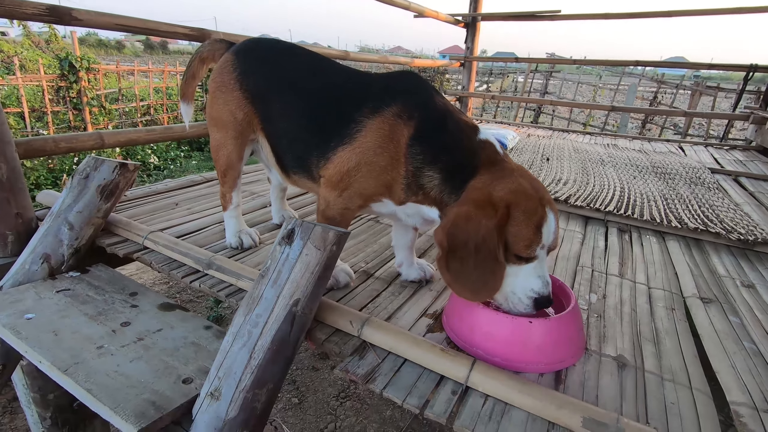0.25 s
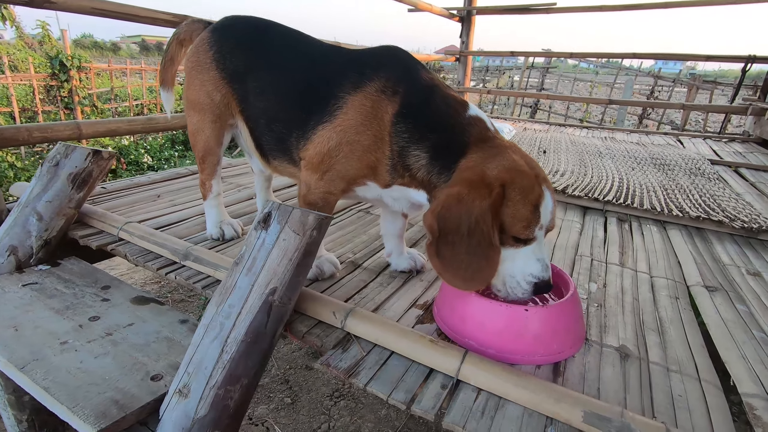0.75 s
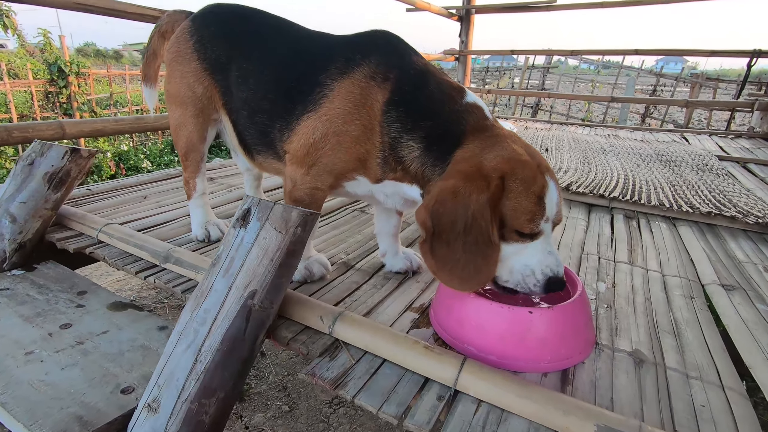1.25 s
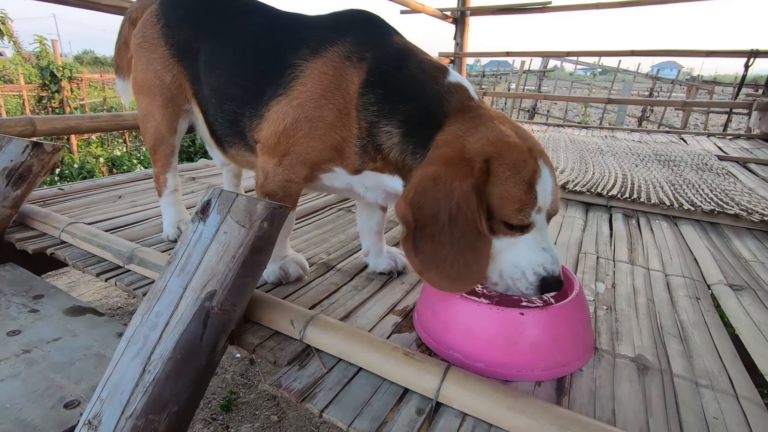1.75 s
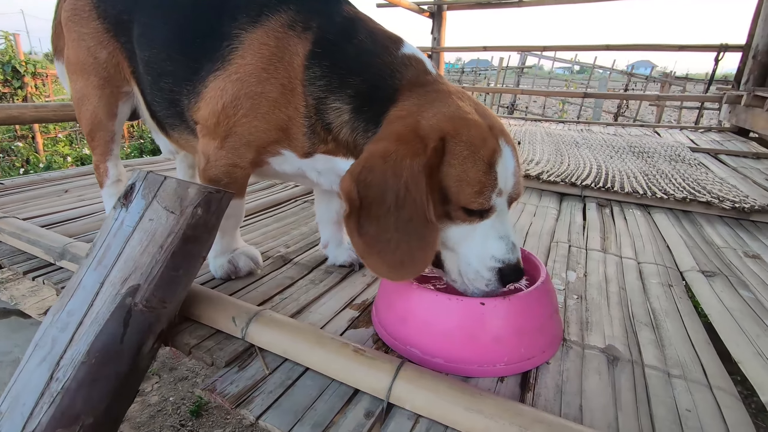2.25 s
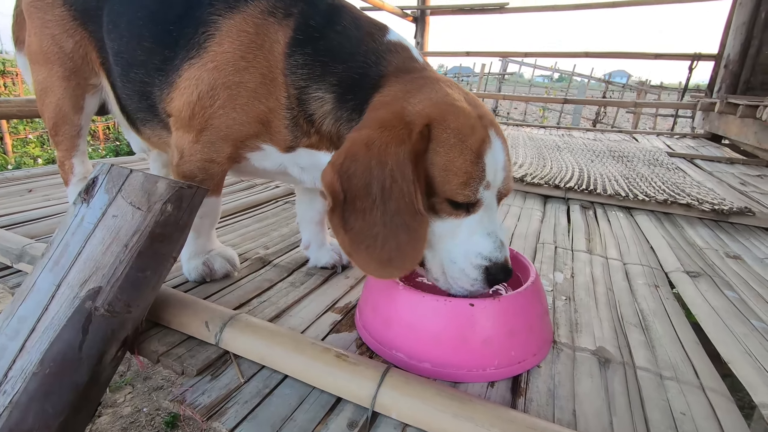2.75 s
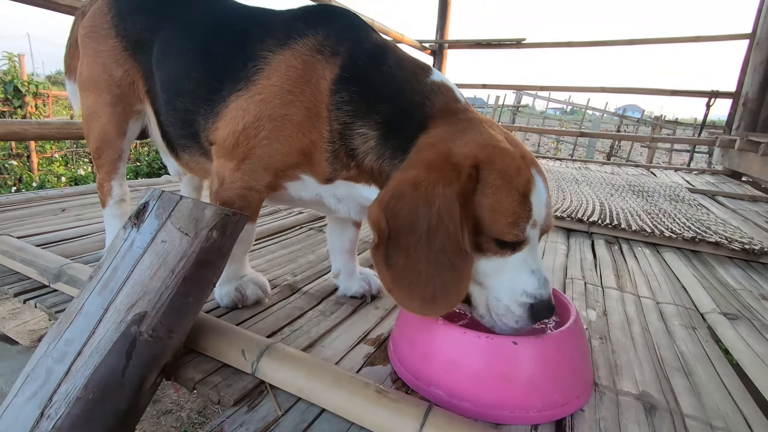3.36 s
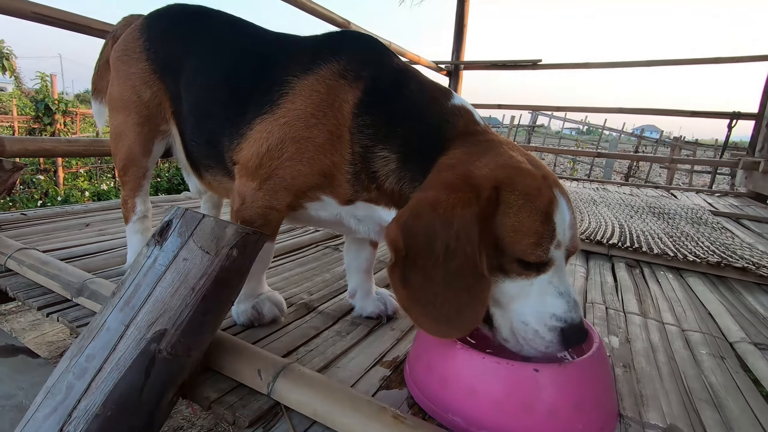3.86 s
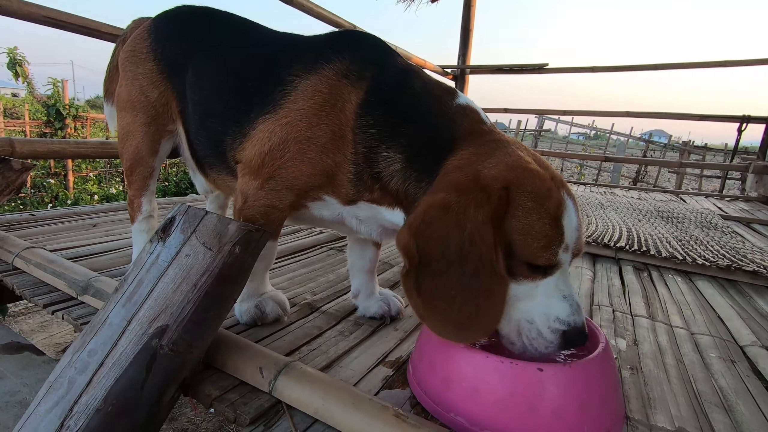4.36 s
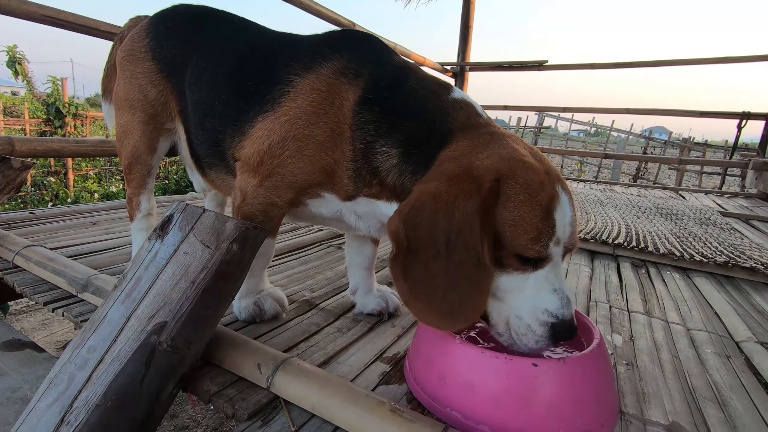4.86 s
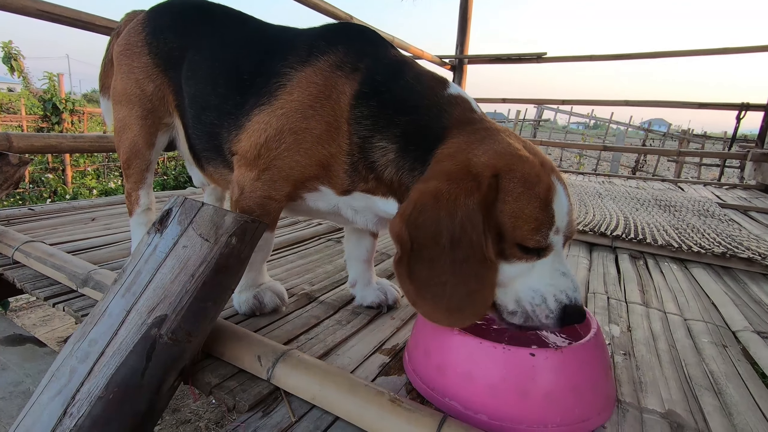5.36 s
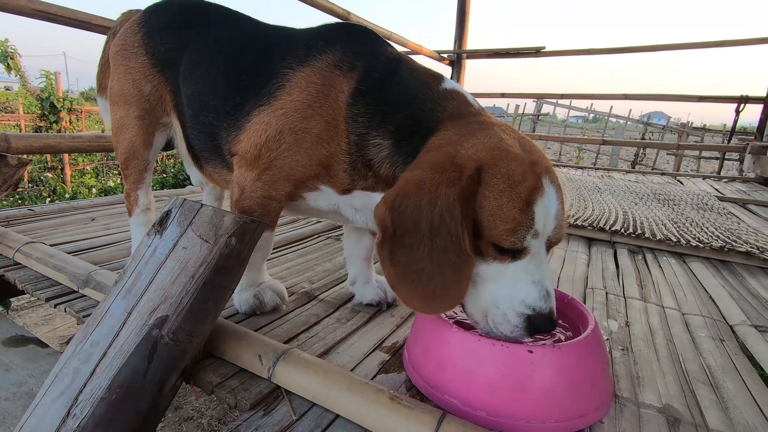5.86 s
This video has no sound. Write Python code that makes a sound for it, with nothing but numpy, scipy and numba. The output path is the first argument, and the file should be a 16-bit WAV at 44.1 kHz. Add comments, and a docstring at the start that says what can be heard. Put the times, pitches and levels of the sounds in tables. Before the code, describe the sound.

Wet slurps and tongue smacks repeat in a fairly even rhythm as a dog drinks from a bowl in the open air. Water plips, gurgles and drips back between laps, getting stronger toward the end. The nearby microphone picks up soft gusts of low wind, a light knock early on and brief scratchy handling noises, over a quiet, steady hiss.

```python
"""A dog laps water from a plastic bowl on an open bamboo deck, a metre from a hand-held camera.
Each stroke of the tongue throws up a swarm of tiny bubbles and smacks in the cavity of mouth and bowl;
the bigger bubbles and gulped air ring out alone. Wind buffets the two microphone ports, and the hand
scuffs and once knocks the housing. Behind it all lie open air, hiss and two faint tones from afar."""
import sys
import numpy as np
from scipy import signal
from scipy.io import wavfile
from scipy.ndimage import uniform_filter1d
from numba import njit

SR = 44100
rng = np.random.default_rng(int(sys.argv[2]) if len(sys.argv) > 2 else 0)


def unload_audio(sound):
    """Save the sound as a 16-bit wav file, at the path given as the first command line argument."""
    columns = np.transpose(np.atleast_2d(sound))
    # keep every value between -1 and 1, then stretch to whole-number steps
    steps = np.round(np.clip(columns, -1, 1) * 32767)
    wavfile.write(sys.argv[1], SR, steps.astype(np.int16))


N = 269451

# The tongue plunges, then smacks as it pulls back.
# Each row: start in seconds, plunge level in dB, wait for the smack in seconds, smack level in dB.
LAPS = [(0.241, -25, 0.11, -37.5), (0.774, -40, 0.07, -33), (1.034, -19.5, 0.106, -31.5),
        (1.35, -18, 0.099, -28.5), (1.806, -27, 0.12, -28.5), (2.112, -19.5, 0.11, -26),
        (2.449, -17, 0.099, -31), (2.973, -34, 0.07, -30.5), (3.25, -26.5, 0.1, -36),
        (3.562, -16.5, 0.093, -26.5), (4.012, -24, .067, -38.5), (4.316, -12, 0.097, -21),
        (4.627, -16, 0.091, -21.5), (5.105, -29, 0.11, -26.5), (5.429, -15.5, 0.1, -27.5),
        (5.743, -18, 0.083, -25.5)]
# Water spilling back between laps. Each row: start in seconds, level in dB.
SPILLS = [(0.038, -35.5), (0.291, -33), (0.824, -30), (1.18, -32.5), (1.333, -29), (1.4, -30),
          (2.175, -26.5), (2.236, -28), (2.426, -33), (3.064, -25.5), (3.233, -27), (3.296, -28),
          (3.358, -29), (3.458, -33.5), (3.536, -32), (4.116, -23.5), (4.294, -27.5), (4.463, -30),
          (5.038, -29), (5.177, -23.5), (5.239, -24.5), (5.413, -16.5)]
# Bubbles that ring out alone. Each row: start in seconds, pitch in Hz, level in dB.
BIG_BUBBLES = [(0.0399, 1850, -25), (0.269, 3200, -26.5), (0.334, 616, -31.5), (0.3646, 2000, -26),
               (0.778, 1830, -25), (1.0486, 3780, -19.5), (1.0504, 680, -25), (1.357, 2350, -24),
               (1.365, 2910, -18), (1.405, 2560, -21), (1.809, 584, -25.5), (2.1152, 2620, -19),
               (2.1213, 1860, -15.5), (2.25, 3330, -11), (2.46, 2040, -14), (2.4734, 2030, -13.5),
               (2.485, 1520, -15), (3.2537, 488, -21), (3.2548, 3160, -11), (3.302, 3770, -19),
               (3.566, 3380, -15.5), (3.572, 2100, -15.5), (3.676, 3550, -22), (4.015, 506, -22),
               (4.083, 3320, -16.5), (4.3193, 3660, -15), (4.3249, 870, -17), (4.3735, 1460, -23),
               (4.3808, 1950, -18.5), (4.414, 1130, -15), (4.421, 1000, -17.5), (4.434, 3740, -26),
               (4.441, 2000, -20), (4.641, 1680, -14.5), (4.65, 1840, -12), (4.731, 756, -26),
               (5.0385, 1280, -21.5), (5.11, 608, -17.5), (5.1836, 3200, -16.5), (5.416, 1230, -17.5),
               (5.4153, 2900, -14.5), (5.439, 660, -17.5), (5.4407, 1920, -25), (5.465, 3700, -25),
               (5.5432, 3140, -9.5), (5.5492, 3480, -16.5), (5.746, 3760, -16), (5.75, 1860, -14.5),
               (5.7225, 2960, -30.5), (5.778, 4150, -29), (5.8004, 2350, -22.5), (5.857, 2900, -26),
               (5.897, 4000, -25)]
# Air pockets gulped under the tongue.
# Each row: start in seconds, pitch in Hz, level in dB, swell as a share of the ring time.
GULPS = [(1.084, 890, -28.5, 0.078), (1.875, 865, -24, 0.013), (2.1681, 930, -24.5, 0.02),
         (2.497, 946, -22, 0.014), (2.989, 863, -32.5, .03), (3.273, 777, -37, .14),
         (3.597, 873, -24.5, 0.13), (4.351, 847, -28.5, 0.15), (5.1823, 832, -31.5, 0.024),
         (5.469, 850, -25.5, 0.064)]
# Thin whistles as a pocket squeezes shut.
# Each row: start in seconds, first pitch in Hz, climb in Hz per ms, level in dB.
SQUEEZES = [(2.174, 1247, 45, -28), (3.605, 1314, 151, -33), (4.361, 2650, 61, -42)]
# Resonances of mouth and bowl. Each row: centre in Hz, width in Hz, gain in dB.
CAVITY = [(453, 230, 6), (850, 346, 8), (1880, 790, 6.5), (3050, 1120, 3.5), (5960, 2200, -6)]
# Fingers on the camera. Each row: start in seconds, level in dB, time to fade by 60 dB in seconds.
SCUFFS = [(0.029, -32, .04), (0.292, -33.5, 0.16), (0.4745, -35, 0.17), (0.502, -32, 0.13),
          (1.949, -33, 0.056), (1.995, -35, 0.11), (2.059, -38, 0.029), (2.124, -32, 0.13),
          (2.445, -34.5, 0.21), (2.546, -31, 0.1), (2.7586, -23, 0.028), (2.7735, -29.5, 0.054),
          (2.799, -27.5, 0.13), (2.8173, -24.5, 0.1), (3.057, -38, 1), (3.101, -33.5, 0.18),
          (3.985, -27.5, 0.11), (4.148, -34.5, 0.13)]
# Modes of the camera housing. Each row: pitch in Hz, ring time in ms, left and right levels in dB.
HOUSING_MODES = [(5700, 1.84, -6, 4), (8640, 10, -21, -11), (1970, 5.4, -5.5, -14.5),
                 (1370, 23, -17.5, -23)]
# Wind at the microphone. Each row: time in seconds, gust strength in dB.
GUSTS = [(0, -40), (.35, -43.5), (.62, -55), (.98, -54.5), (1.09, -41.5), (1.27, -60), (1.42, -40.5),
         (2.03, -60), (2.111, -38), (2.45, -47.5), (2.55, -35), (2.65, -49), (2.82, -39.5), (4.07, -54.5),
         (4.5, -52), (6.11, -60)]
# Open air and microphone hiss. Each row: frequency in Hz, relative spectral density in dB.
AIR_SPECTRUM = [(200, 1.5), (456, 3.5), (1230, -1), (1740, -0.5), (6760, -1), (9060, 19), (12800, -100.5),
                (16000, -49)]
# Far tones. Each row: start and end in seconds, first and last pitch in Hz, level in dB.
FAR_TONES = [(4.523, 4.637, 1760, 1814, -52), (4.92, 6.017, 854, 821, -59)]


def lapping():
    """The dog at the bowl, a metre off: rim and deck scatter different short echoes to each port."""
    rings_alone = big_bubbles() + gulps() + pops()
    rings_alone *= undb(2.8 * walk(150))  # the churning surface roughens each ring
    stir = tongue_strokes()
    wet = rings_alone + droplets(stir) + slurp(stir)
    t = np.arange(900) / SR
    echoes = undb(-31 - 60 * t / 0.08) * rng.standard_normal((2, 900))
    return wet + signal.fftconvolve(wet, echoes, axes=1)[:, :N]


def tongue_strokes():
    """How hard the water is stirred: each plunge, smack and spill swells fast and dies away."""
    plunges = [(s, db, .095, .0036) for s, db, _, _ in LAPS]
    smacks = [(s + wait_s, db, .085, .001) for s, _, wait_s, db in LAPS]
    spills = [(s, db, .09, .001) for s, db in SPILLS]
    return bursts(plunges + smacks + spills, smooth_ms=1.2)


def big_bubbles():
    """Single bubbles ring and climb a little; the smaller, higher ones die sooner."""
    s, hz, db = np.transpose(BIG_BUBBLES)
    return bubbles(s, hz, db, t60_ms=16.3 * (hz / 1000) ** -0.81, rise=0.15)


def gulps(squeeze_ms=36):
    """Each air pocket gurgles low while its mouth chirps upward; some whistle as they close."""
    s, hz, db, swell = np.transpose(GULPS)
    t60_ms = 43.3 * (1 + 2 * swell)
    # a pocket splits in two unequal parts that beat against each other
    split = 1 + .13 * rng.choice([-1, 1], len(s))
    pocket = bubbles(s, hz, db, t60_ms, rise=0.13, swell=swell)
    pocket += bubbles(s, hz * split, db - 7, t60_ms, rise=0.13, swell=swell)
    chirp = bubbles(s + .012, hz * 1.964, db - 6, t60_ms=27.6, rise=0.37, swell=0.04)
    s, hz, climb, db = np.transpose(SQUEEZES)
    whistle = bubbles(s, hz, db, squeeze_ms, rise=climb * squeeze_ms / hz, swell=0.13)
    return pocket * undb(6 * walk(350)) + (chirp + whistle) * undb(6 * walk(250))


def pops():
    """The tongue leaves the water with a dull pop at the start of each smack."""
    s, _, wait_s, db = np.transpose(LAPS)
    return bubbles(s + wait_s, hz=437, db=db - 0.5, t60_ms=9.5, rise=1.0)


def droplets(stir, count=3300):
    """A swarm of tiny bubbles. Droplets keep falling after a stroke, so it never quite stops."""
    when, faintness, cycles, rise = rng.random((count, 4)).T
    s = when * N / SR
    hz = np.clip(2500 * np.exp(0.557 * rng.standard_normal(count)), 350, 4300)
    stroke_db = 10.58 * np.log10(stir[(s * SR).astype(int)] + undb(-61))
    db = stroke_db - 22 - 6.52 * np.log(faintness + 0.073) + 1.86 * np.log2(hz / 2000)
    return bubbles(s, hz, db, t60_ms=(2 + 40 * cycles ** 2) / hz * 1000, rise=rise)


def slurp(stir, clicks_per_s=170):
    """The wet tongue tears loose in ragged clicks that ring the cavity of mouth and bowl."""
    impulses = (rng.random(N) < clicks_per_s / SR) * rng.random(N)
    clicks = signal.lfilter([1], [1, -np.exp(-1 / (.0012 * SR))], impulses)
    ragged = undb(2.5 * walk(300)) * (.27 + 1.4 * clicks)
    smacks = stir * ragged * (rng.standard_normal(N) + 0.2 * rng.standard_normal((2, N)))
    cavity = sum(undb(db + 2.6 * walk(40)) * band(smacks, hz - width / 2, hz + width / 2)
                 for hz, width, db in CAVITY)
    return cavity * undb([[-4.5], [-1.5]])


def bubbles(s, hz, db, t60_ms, rise, swell=0.011):
    """Bubbles ring from one spot a little right of centre and reach the ports out of step."""
    pan_scatter, phase_scatter = rng.standard_normal((len(s), 2)).T
    pan_db = -3 + 2.6 * pan_scatter
    phase = -hz / 6000 + .5 * phase_scatter
    return rings(s, hz, t60_ms, rise, db + pan_db / 2, db - pan_db / 2, phase, swell)


def scuffs():
    """Fingers on the housing crackle in the treble, louder at the right port, partly in opposed phase."""
    grit = undb(4.5 * walk(200))
    opposed = np.array([[-1], [1]]) * rng.standard_normal(N)
    hiss = band(opposed + 3.4 * rng.standard_normal((2, N)), 2900, 9080, order=3)
    touch = bursts([(s, db, t60_s, .0015) for s, db, t60_s in SCUFFS], smooth_ms=0.56)
    return level(grit * hiss, -4) * touch * undb([[-4], [3]])


def knock(start_s=1.572):
    """One knock rings the housing; its bending waves spread out, the high ones arriving first."""
    hz, t60_ms, left_db, right_db = np.transpose(HOUSING_MODES)
    tick = rings(start_s, hz, t60_ms, -.3, left_db, right_db, phase=np.pi)
    t = np.maximum(np.arange(N) / SR - start_s, 1e-9)
    crest_s, fade_s = np.array([[.007], [.0046]]), np.array([[.017], [.037]])  # left, right
    swing = np.cos(2 * np.pi * np.log(t / crest_s) / np.log(2.5))  # each lasts 2.5 times the one before
    envelope = (1 - np.exp(-(t / 0.0027) ** 2)) * np.exp(-(t / fade_s) ** 4)
    return tick + undb([[-10.5], [-9.5]]) * swing * envelope


def wind():
    """Eddies push each microphone port on its own; the lowest rumble follows the gusts most."""
    gust_db = np.interp(np.arange(N) / SR, *np.transpose(GUSTS))
    rumble, puffs = 0, np.array([walk(13), walk(12)])
    for lo_hz, hi_hz, db, follow in [(20, 61.8, 1.5, 1), (62, 146.7, -6, 0.53), (170, 780, -32, 0.53)]:
        flutter_db = 2.97 * puffs + walk(6.9)
        eddies = level(band(rng.standard_normal((2, N)), lo_hz, hi_hz) * undb(flutter_db), db)
        rumble += eddies * undb(-45 + follow * (gust_db + 47))
    return rumble * undb([[-1], [4.5]])


def air():
    """Open air and microphone hiss in flickering half octaves, partly shared by the ports below the treble."""
    hz, db = np.transpose(AIR_SPECTRUM)
    hiss, swell = 0, walk(16)
    for centre_hz in 220 * 2 ** (np.arange(13) / 2):
        mid, side = band(rng.standard_normal((2, N)), centre_hz / 2 ** .25, centre_hz * 2 ** .25)
        side *= .6 if centre_hz < 4500 else 1.1
        band_db = np.interp(np.log(centre_hz), np.log(hz), db)
        flicker_db = 1.8 * (swell + walk(10))
        hiss += undb(band_db + flicker_db) * np.array([mid + side, mid - side])
    return level(hiss, -51.5) * undb([[-2.2], [1.8]])


def far_tones():
    """Thin gliding tones from far off swell, waver and fade."""
    t, tones = np.arange(N) / SR, 0
    for start_s, end_s, from_hz, to_hz, db in FAR_TONES:
        progress = np.clip((t - start_s) / (end_s - start_s), 0, 1)
        hz = (from_hz + (to_hz - from_hz) * progress) * (1 + 0.016 * walk(40))
        envelope = undb(db + 4 * walk(60)) * np.sqrt(np.sin(np.pi * progress).clip(0))
        tones += envelope * np.sin(2 * np.pi * np.cumsum(hz) / SR)
    return tones


def rings(s, hz, t60_ms, rise, left_db, right_db, phase, swell=0.018):
    """Each ring swells, glides in pitch by the share rise and leads by phase at the right port."""
    s, hz, t60_ms, phase = np.broadcast_arrays(s, hz, t60_ms, phase)
    length, step = t60_ms * SR / 1000, 2 * np.pi * hz / SR
    gain = undb(np.array([left_db, right_db]) + 91 * swell)  # makes up for the peak lost to the swell
    size = gain * np.exp(1j * np.array([0 * phase, phase]))
    turns = np.exp(1j * step - np.log(1000) / length)
    glide = np.exp(1j * step * rise / length)
    opening = np.exp(-1 / (swell * length))
    return damped_sines(N, (s * SR).astype(int), length.astype(int), turns, glide, opening, size)


@njit
def damped_sines(n, start, length, turns, glide, opening, size):
    """Two channels of sines: a pointer turns, shrinks and changes speed a little each sample."""
    out = np.zeros((2, n))
    for k in range(len(start)):
        z, shut, turn = 1 + 0j, 1., turns[k]
        for i in range(min(length[k], n - start[k])):
            z, turn, shut = z * turn, turn * glide[k], shut * opening[k]
            out[0, start[k] + i] += (1 - shut) ** 2 * (size[0, k] * z).imag
            out[1, start[k] + i] += (1 - shut) ** 2 * (size[1, k] * z).imag
    return out


def bursts(rows, smooth_ms):
    """An envelope of bursts. Each row: start in seconds, level in dB, fade and swell in seconds."""
    power = np.zeros(N)
    for s, db, t60_s, swell_s in rows:
        part = power[int(s * SR):int((s + t60_s) * SR)]
        t = np.arange(len(part)) / SR
        shape = undb(-60 * t / t60_s) * (1 - np.exp(-t / swell_s))
        part += (undb(db) * shape / shape.max()) ** 2
    return uniform_filter1d(np.sqrt(power), max(int(smooth_ms * SR / 1000), 1))


def walk(per_s):
    """A smooth random wander: per_s new levels a second, slewed twice."""
    hold = int(SR / per_s)
    steps = np.repeat(rng.standard_normal(N // hold + 1), hold)
    return 1.05 * uniform_filter1d(uniform_filter1d(steps, hold), hold)[:N]


def undb(db):
    return 10 ** (np.asarray(db) / 20)


def level(x, db):
    return x * undb(db) / np.sqrt(np.mean(x ** 2))


def band(x, lo_hz, hi_hz, order=2):
    return signal.sosfilt(signal.butter(order, [lo_hz, hi_hz], "bandpass", fs=SR, output="sos"), x)


def scene():
    """The dog in front, hand and wind right on the microphone, the open air behind."""
    return lapping() + scuffs() + knock() + wind() + air() + far_tones()


def record(dry, dull_hz=10000, top_hz=15800):
    """The microphone dulls the treble and the recorder cuts the top."""
    dull = signal.sosfilt(signal.butter(2, dull_hz, fs=SR, output="sos"), dry)
    return signal.sosfilt(signal.ellip(10, .2, 90, top_hz, fs=SR, output="sos"), dull)


dry = scene()
out = record(dry)
unload_audio(out)
```